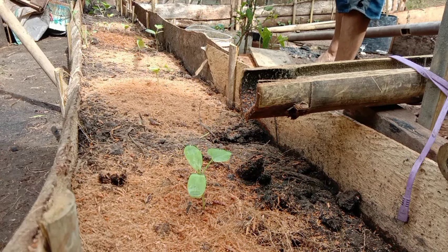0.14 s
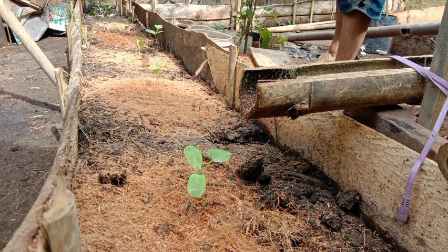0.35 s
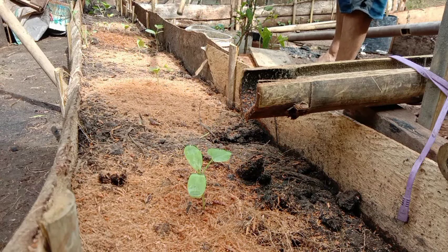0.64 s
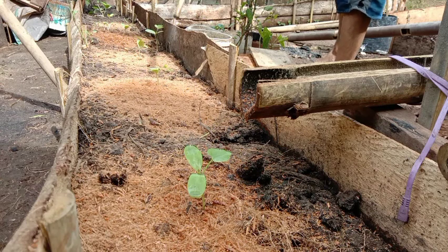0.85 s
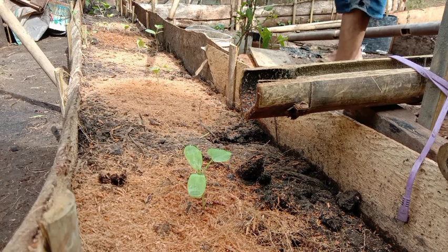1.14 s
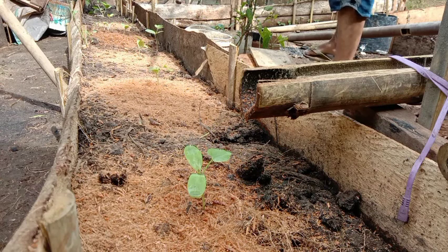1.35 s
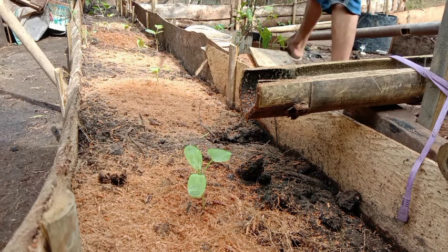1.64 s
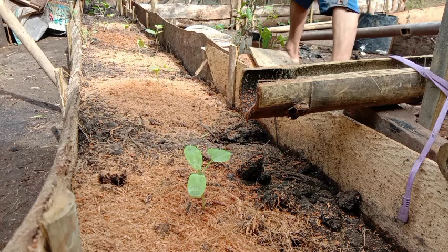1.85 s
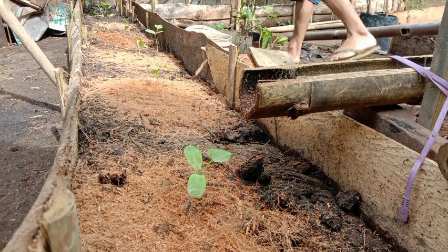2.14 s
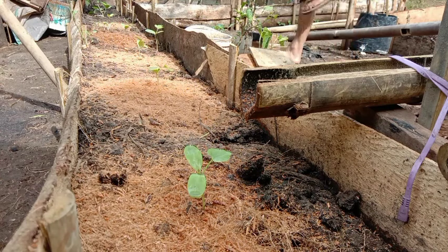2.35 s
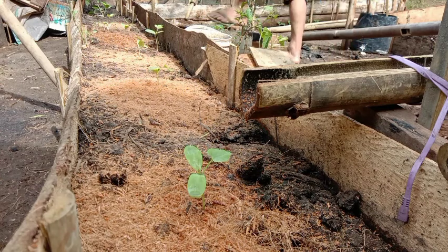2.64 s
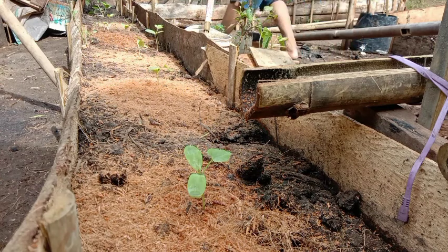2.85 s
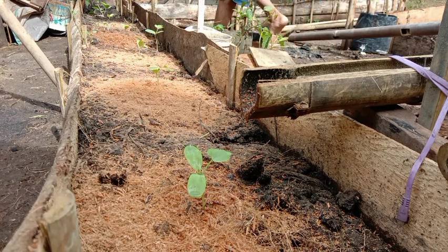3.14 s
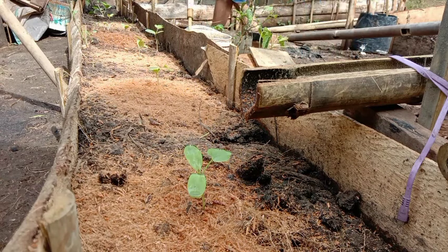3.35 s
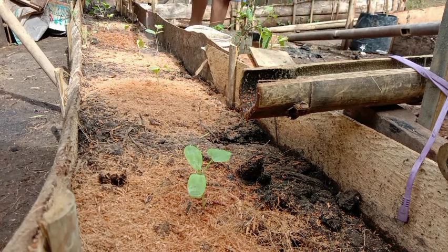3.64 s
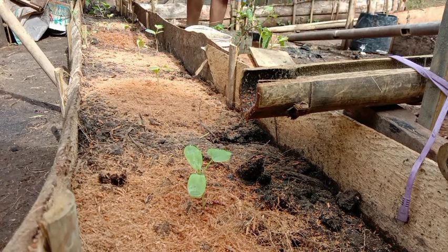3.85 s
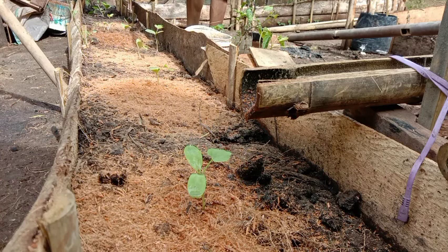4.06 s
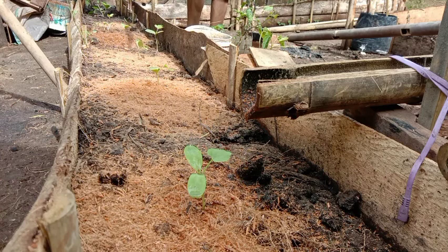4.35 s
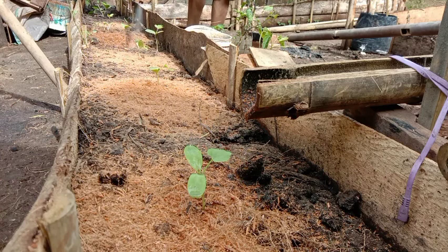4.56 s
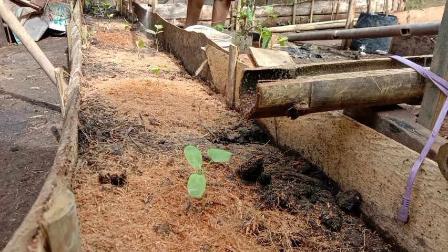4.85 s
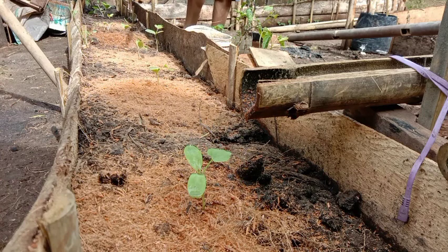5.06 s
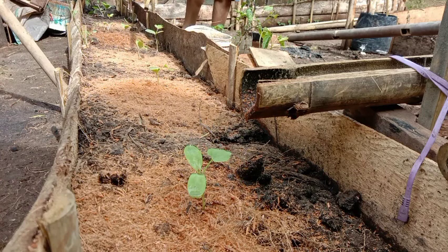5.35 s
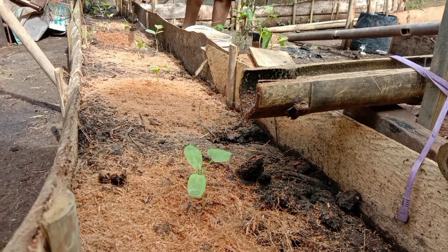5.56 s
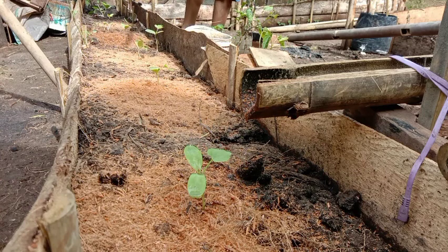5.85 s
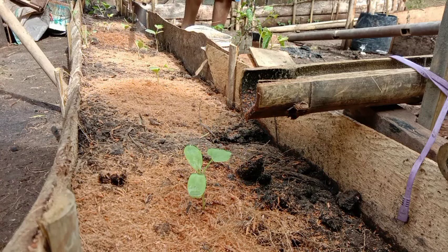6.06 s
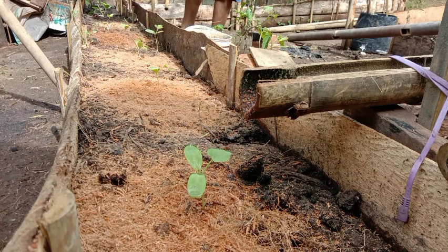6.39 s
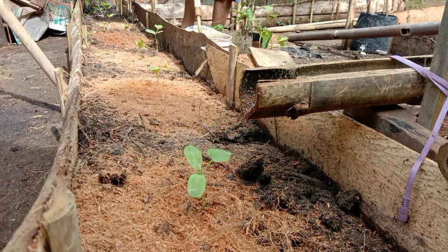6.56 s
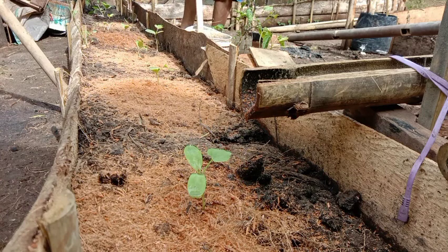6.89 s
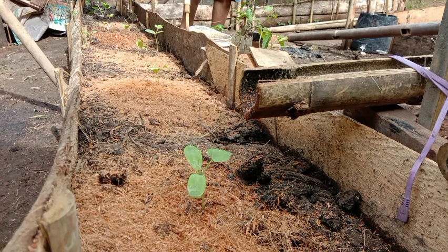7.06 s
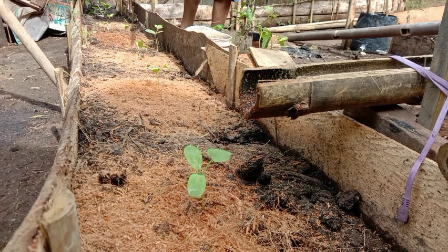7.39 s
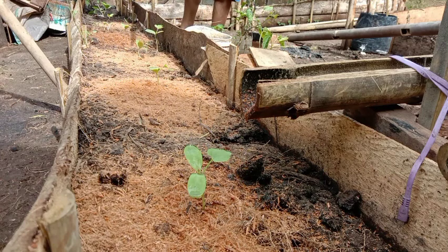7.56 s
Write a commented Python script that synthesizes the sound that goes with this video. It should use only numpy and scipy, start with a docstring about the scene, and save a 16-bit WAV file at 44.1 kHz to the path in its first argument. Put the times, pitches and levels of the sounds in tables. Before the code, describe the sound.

Three runs of short, bright hisses come from a hand sprayer pumped near the microphone outdoors. The first ends in a rubbery honk, followed by faint bird chirps farther off. The second is longer, with sharp spits, wet knocks, trickling and one more honk. In the third, air gets in and the nozzle spits, splutters and sings as the liquid runs out.

```python
"""A hand pump sprayer mists seedlings outdoors, in three runs of quick strokes.
Firm pushes and softer pulls hiss through the nozzle, and on the pulls liquid slurps in the barrel,
falling in pitch. The plunger seal honks as the first run ends, and small birds chirp in the pause.
The second run spits and dribbles, with another loud honk. In the last, air gets into the line:
the jet splutters, the nozzle sings and the sound thins as the barrel runs dry."""
import sys
import numpy as np
from scipy import signal
from scipy.fft import rfft, irfft, next_fast_len
from scipy.io import wavfile
from scipy.ndimage import map_coordinates

SR = 44100
rng = np.random.default_rng(int(sys.argv[2]) if len(sys.argv) > 2 else 0)


def output_pcm(signal):
    """Save a mono or channel-first signal as 16-bit PCM at the path in sys.argv[1].

    Samples are clipped to [-1, 1] before scaling.
    """
    pcm = np.clip(np.atleast_2d(signal).T, -1, 1) * 32767
    wavfile.write(sys.argv[1], SR, np.round(pcm).astype(np.int16))


N = 340893

# Tone of the still air, the jet's body, the sizzle of its finest drops, a spit and the dribble.
# Each row: frequency in Hz, relative level in dB.
AIR_TONE = [(25, -19), (60, -16), (100, -4.5), (180, -7), (400, -22), (1000, -16.5), (2500, -20.5),
            (5500, -25.5), (8000, -21), (10000, -25.5), (14000, -48)]
JET_TONE = [(500, -29), (900, -15), (2100, -13), (3000, -24), (4000, -7), (4700, -2.5), (5500, -1),
            (6300, -1), (7100, -3.5), (8000, -8), (9200, -7.5), (12000, -32)]
MIST_TONE = [(6500, -27), (8500, -8.5), (10400, 6.5), (11200, 3), (12200, 6.5), (12800, -0.5),
             (13600, 11.5), (14500, -18.5)]
SPIT_TONE = [(400, -30.5), (900, -20.5), (2200, -24.5), (3500, -9.5), (5000, -0.5), (7000, 1), (8300, -10),
             (11000, -8), (13700, -15.5)]
DRIBBLE_TONE = [(300, -18), (800, -15.5), (1500, -7.5), (3000, -7.5), (4200, -15.5), (5600, -1.5),
                (7200, 0), (9000, -7), (14000, -9)]
# Short, firm pushes. Each row: start and length in seconds, level and swell over the stroke in dB.
PUSHES = [(-.069, 0.16, -35.5, -11), (0.295, 0.14, -34.5, 0.5), (0.637, 0.16, -34, -7),
          (1.014, 0.2, -34.5, 0), (2.811, 0.11, -41, -4.5), (2.994, 0.18, -33.5, 3),
          (3.401, 0.085, -24.5, -9.5), (3.662, .13, -31, 0.5), (3.999, .11, -33, -14.5),
          (4.304, 0.19, -29.5, -18.5), (4.822, 0.3, -38, -1), (5.465, 0.27, -36.5, 3.5),
          (6.525, 0.15, -40, -33.5), (6.868, 0.17, -37, 5.5)]
# Softer pulls refill the barrel. Each row: start and length in seconds, level, swell and slurp in dB.
PULLS = [(0.115, 0.2, -36.5, -11.5, -50.5), (0.457, 0.21, -37.5, -1.5, -52.5),
         (0.811, 0.23, -38.5, 6.5, -54.5), (3.135, 0.21, -40.5, 11, -47), (3.479, 0.2, -38, -7.5, -51.5),
         (3.817, 0.16, -39, -10, -51.5), (4.086, .18, -42, -0.5, -48.5), (4.503, .35, -41, -7.5, -50.5),
         (5.128, 0.34, -41, 0.5, -56.5), (6.672, 0.25, -48, 30.5, -65), (7.097, .256, -41, 4.5, -85.5)]
# Narrow resonances of nozzle and barrel. Each row: centre and width in Hz, gain in dB.
NOZZLE_RESONANCES = [(3583, 370, -7), (4690, 220, -8), (5160, 120, -4), (5230, 510, -7.5),
                     (5610, 570, -2.5), (6920, 480, -11), (7400, 180, -8.5)]
# The rasp changes with where the wand points. Each row: time in seconds, gain in dB.
RASP_RIDE = [(.6, 0), (1.1, -3), (2.8, -3.5), (5.7, -6.5), (6.7, -5)]
# Air gets into the line. Each row: time in seconds, share of splutter from 0 to 1.
SPLUTTER_MIX = [(0, 0.35), (6.7, 0.29), (6.9, 1), (7.15, 1)]
# The gardener moves about. Each row: start and length in seconds, level in dB.
THUDS = [(0, .1, -71), (2.799, 0.32, -72.5), (3.05, 0.337, -75.5), (5.2, .5, -79), (7.201, 0.17, -72)]
# The barrel rings higher or lower with its liquid. Each row: time in seconds, pitch as a multiple.
BARREL_PITCH = [(1.2, 1.14), (3.1, .96), (4.2, .92), (4.7, 1.08), (5.2, 1.15)]
# The valve snaps open. Each row: start in seconds, level in dB, seconds to die away by 60 dB.
SPITS = [(0.481, -53, 0.068), (.84, -52.5, .1), (2.824, -31, 0.25), (3.355, -36, 0.099),
         (3.384, -40.5, 0.094), (3.4, -26.5, 0.15), (3.661, -42, .08), (3.838, -55, .1), (4.015, -33, 0.12),
         (4.314, -32, 0.13), (6.544, -22.5, 0.13), (7.053, -45, 0.12), (7.108, -40.5, .16),
         (7.311, -34, 0.045)]
# A bird's chip (grace note, loud note, tail) and its answer, three notes stepping down. Each row:
# delay and length in seconds, first and last pitch as multiples, width in Hz, gain in dB.
CHIP_NOTES = [(-.04, 0.11, 1.06, 1.17, 823, -13), (0, .07, .97, 1.05, 615, -0.5),
              (0.056, .06, 1.03, 1, 300, -10)]
CASCADE_NOTES = [(0, 0.072, 0.91, 1.1, 323, 4), (.05, .068, .875, .83, 285, -1),
                 (.095, .06, .77, .7, 420, -12.5)]
# The bird chips. Each row: time in seconds, pitch in Hz, level in dB.
CHIPS = [(0.751, 6440, -61.5), (1.21, 5800, -60.5), (1.595, 5690, -52.5), (2.07, 5480, -57.5),
         (2.72, 5740, -65), (5.079, 5660, -54), (5.92, 6980, -71), (7.349, 6970, -67)]
# It answers. Each row: start in seconds, pitch in Hz, level and accent on the first note in dB.
CASCADES = [(1.304, 5680, -60, -13), (1.78, 5600, -61, -2.5), (2.245, 5510, -64, -1.5),
            (2.871, 5700, -68.5, 9), (5.975, 5320, -60, -25)]
# A lower bird slides down. Each row: start in seconds, first pitch in Hz, level in dB.
BIRD_SLIDES = [(1.45, 3805, -77), (1.685, 2930, -70), (1.73, 4100, -74), (1.776, 3120, -73)]
# Overtones of the rubbing seal. Each row: harmonic number, gain in dB.
SEAL_OVERTONES = [(2, -1), (3, -19.5), (4, -16.5)]
# The seal sticks and honks. Each row: start and length in seconds, pitch in Hz, level in dB.
HONKS = [(.93, 0.041, 412, -40), (1.097, 0.098, 230, -60.5), (4.205, 0.084, 325, -58),
         (4.268, .19, 308, -57), (4.344, 0.039, 376, -38.5)]
# It lets go after a loud honk. Each row: start and length in seconds, level in dB.
GULPS = [(.963, .024, -45), (4.514, 0.015, -47)]
# Its short, pure peeps. Each row: start in seconds, pitch in Hz, level in dB.
PEEPS = [(1.083, 870, -47.5), (4.498, 980, -48.5), (6.151, 845, -54.5)]
# Wet knocks of the plunger. Each row: start and length in seconds, level in dB.
KNOCKS = [(0.963, 0.094, -45), (2.866, 0.059, -40), (3.405, 0.021, -47), (6.553, 0.058, -43)]
# The ring of a knock. Each row: first pitch, last pitch and width in Hz, gain in dB.
KNOCK_RESONANCES = [(399, 460, 350, -12), (884, 740, 470, -1), (1500, 1350, 500, -2.5)]
# Distant hums and calls. Each row: start and length in seconds, pitch in Hz, level in dB.
HUMS = [(1.173, .17, 678, -71.5), (1.61, .25, 410, -71.5), (2.431, 0.19, 424, -75),
        (5.731, 0.67, 1009, -77), (5.796, 0.4, 5150, -78), (5.829, 0.5, 2060, -83),
        (2.401, 0.037, 1500, -71.5)]
# A far drone. Each row: start and length in seconds, first pitch, last pitch, width in Hz, level in dB.
DRONE = [(1.6, .29, 122, 88, 28, -64), (1.6, .11, 260, 200, 60, -69)]
# Weak mist around the strokes. Each row: start and length in seconds, level and swell in dB.
DRIBBLES = [(2.419, 0.44, -58, 1.5), (3.086, 1.63, -58.5, -7.5), (6.208, 0.42, -60.5, 3)]
# The nozzle starts up. Each row: start and length in seconds, first and last pitch in Hz, level in dB.
SQUIRTS = [(2.46, 0.042, 2800, 3110, -63.5), (2.985, 0.064, 1120, 3940, -56.5),
           (4.785, .093, 5280, 4640, -45.5), (4.835, 0.063, 1900, 3340, -54)]
# The nozzle sings, one curve a stroke. Each point: time in seconds, pitch in Hz, level in dB.
SINGING_CURVES = [
    [(6.84, 3210, -61.5), (6.88, 3025, -48.5), (6.908, 3280, -54), (6.924, 3260, -41), (6.994, 3030, -40),
     (7.02, 3260, -73)],
    [(7.103, 2513, -60), (7.118, 2503, -52), (7.19, 2325, -54), (7.28, 2450, -59), (7.322, 2480, -48.5),
     (7.35, 2500, -70)],
]
# Its partials. Each row: pitch as a multiple, width in Hz, gain in dB.
SINGING_PARTIALS = [(0.999, 323, -1), (1.931, 450, -4.5)]


def undb(db):
    """Decibels to gain."""
    return 10 ** (np.asarray(db) / 20)


def unit(x):
    """Scale to rms 1."""
    return x / np.sqrt(np.mean(x ** 2) + 1e-18)


def add(out, start, x):
    """Mix x into out at start seconds."""
    i = int(start * SR)
    x, i = x[max(-i, 0):], max(i, 0)
    out[i:i + len(x)] += x[:max(len(out) - i, 0)]


def curve(points):
    """An automation line through (seconds, value) points."""
    return np.interp(np.arange(N) / SR, *np.transpose(points))


def colour(x, points):
    """EQ x through (Hz, dB) points, at rms 1."""
    hz, db = np.transpose(points)
    size = next_fast_len(len(x))
    bins_hz = np.maximum(np.fft.rfftfreq(size, 1 / SR), 1)
    gain = undb(np.interp(np.log(bins_hz), np.log(hz), db))
    return unit(irfft(rfft(x, size) * gain, size)[:len(x)])


def resonate(x, hz, width):
    """One resonance, gain 1 at its centre."""
    return signal.lfilter(*signal.iirpeak(hz, hz / width, fs=SR), x + 1e-18 * rng.standard_normal(len(x)))


def wander(count, rate_hz):
    """Smooth random drift of rms 1, slower than rate_hz."""
    lead = SR // 10
    sos = signal.butter(4, rate_hz, fs=SR, output="sos")
    return unit(signal.sosfilt(sos, rng.standard_normal(count + lead))[lead:])


def flutter(x, depth_db, width_hz, hold_s):
    """Patches of the spectrum swell and fade by chance, each for about hold_s."""
    hz, t, spectrum = signal.stft(x, SR, nperseg=1024)
    chance = rng.standard_normal((200, 400))
    grid = np.meshgrid(hz / width_hz, t / hold_s, indexing="ij")
    patches = unit(map_coordinates(chance, grid, order=1, mode="wrap"))
    _, fluttered = signal.istft(spectrum * undb(depth_db * patches), SR, nperseg=1024)
    return unit(fluttered[:len(x)]) * np.std(x)


def gate(length, rise, fall):
    """An envelope with smooth fades, all in seconds."""
    t = np.arange(int(length * SR)) / SR
    fade_in = np.sin(np.pi / 2 * np.clip(t / rise, 0, 1))
    fade_out = np.sin(np.pi / 2 * np.clip((length - t) / fall, 0, 1))
    return (fade_in * fade_out) ** 2


def swelling(env, db, swell_db):
    """Ramp an envelope by swell_db, passing db halfway."""
    return env * undb(db + swell_db * np.linspace(-.5, .5, len(env)))


def glide(count, first_hz, last_hz):
    """Phase of a sliding pitch."""
    return 2 * np.pi * np.cumsum(np.geomspace(first_hz, last_hz, count)) / SR


def blown(phase, width_hz):
    """A breathy resonance that follows a phase, blown by turbulence."""
    count, rate_hz = len(phase), width_hz / 2
    return unit(wander(count, rate_hz) * np.cos(phase) + wander(count, rate_hz) * np.sin(phase))


def notes(rows, rise_share, fall_share):
    """Play rows of breathy, gliding notes."""
    out = np.zeros(N)
    for start, length, first_hz, last_hz, width_hz, db in rows:
        env = gate(length, rise_share * length, fall_share * length)
        add(out, start, undb(db) * env * blown(glide(len(env), first_hz, last_hz), width_hz))
    return out


def still_air(db=-83):
    """A bed of outdoor air that flickers faintly."""
    air = colour(rng.standard_normal(N), AIR_TONE)
    return undb(db) * flutter(air, depth_db=3, width_hz=400, hold_s=.12)


def droplets(spread_db):
    """The jet breaks up into a dense stream of tiny, unequal clicks."""
    return rng.standard_normal(N) * undb(spread_db * wander(N, 3900))


def spray(jet_db=-4.5, rasp_db=-5.5, mist_db=-7, rumble_db=-46, sputter_db=.67,
          rasp_hz=3150, rasp_width_hz=1200, rasp_loss=.54, rasp_ref_db=-39.5):
    """Pump pressure drives the jet, its coarse rasp and the fine mist; the flow sputters a little."""
    flow, rasp_flow = np.zeros((2, N))
    for strokes, rise_s, fall_s in (PUSHES, .061, .059), (PULLS, .12, .07):
        for start, length, db, swell_db, *_ in strokes:
            env = swelling(gate(length, rise_s, fall_s), db, swell_db)
            add(flow, start, env)
            # a harder jet breaks up finer, so less of it is rasp
            add(rasp_flow, start, env * undb(-rasp_loss * (db - rasp_ref_db)))
    jet = undb(jet_db) * flow * colour(droplets(spread_db=.5), JET_TONE)
    rasp = resonate(droplets(spread_db=0), rasp_hz, rasp_width_hz)
    rasp = unit(resonate(rasp, rasp_hz, rasp_width_hz))
    jet += undb(rasp_db + curve(RASP_RIDE)) * rasp_flow * rasp
    jet += sum(undb(db) * resonate(jet, hz, width) for hz, width, db in NOZZLE_RESONANCES)
    mist = undb(mist_db) * flow * colour(droplets(spread_db=3), MIST_TONE)
    # the moving wand shifts the resonances of the hiss
    hiss = flutter(jet + mist, depth_db=2.6, width_hz=130, hold_s=.07)
    # the pump body rumbles while it is worked
    rumble = colour(rng.standard_normal(N), [(30, -21.5), (110, 8), (250, -1.5), (600, -17), (1500, -42.5)])
    return hiss * undb(sputter_db * wander(N, 63)) + undb(rumble_db) * flow * rumble


def splutter(hiss, surge_db=2):
    """Bubbles passing the nozzle break the hiss into brief, coarse resonances and make it surge."""
    share = curve(SPLUTTER_MIX)
    broken = flutter(hiss, depth_db=4.3, width_hz=330, hold_s=.022)
    return (1 - share) * hiss + share * broken * undb(surge_db * wander(N, 45))


def barrel_pitch(time):
    """The barrel's tuning at a time, as a multiple."""
    return np.interp(time, *np.transpose(BARREL_PITCH))


def bubbles(count, low_hz=650, high_hz=1500, cycles=22, size_db=4):
    """A dense stream of small bubbles, each a short rising ring."""
    out = np.zeros(N)
    for when, pitch, size in rng.random((count, 3)):
        hz = low_hz * (high_hz / low_hz) ** pitch
        samples = int(cycles * SR / hz)
        ring = np.exp(-np.linspace(0, 5, samples)) * np.sin(glide(samples, hz, 1.2 * hz))
        add(out, when * N / SR, undb(-size_db * np.log(size + .02)) * ring)
    return unit(out)


def slurp(first_hz=1250, last_hz=850, width_hz=650, low_cut_hz=520,
          push_db=-60, rush_db=-2, skirt_db=-7, gurgle_db=.5, bubble_db=-2):
    """Liquid and air churn in the barrel; the cavity grows along the stroke, so its resonance sinks."""
    rush, flow = np.zeros((2, N))
    for start, length, _, _, db in [(*push, push_db) for push in PUSHES] + list(PULLS):
        env = undb(db) * gate(length, rise=.078, fall=.05)
        phase = barrel_pitch(start) * glide(len(env), first_hz, last_hz)
        core, skirt = blown(phase, width_hz), blown(phase, 3 * width_hz)
        add(flow, start, env)
        add(rush, start, env * (core + undb(skirt_db) * skirt))
    churn = rush * undb(rush_db + gurgle_db * wander(N, 55))
    churn += undb(bubble_db) * flow * bubbles(count=1200)
    churn = flutter(churn, depth_db=4, width_hz=150, hold_s=.03)
    low_cut = signal.butter(4, low_cut_hz, "high", fs=SR, output="sos")
    return signal.sosfilt(low_cut, churn + 1e-18 * rng.standard_normal(N))


def thuds(first_hz=115, last_hz=90, width_hz=100):
    """The gardener's movements thud softly through the boards."""
    rows = [(start, length, first_hz, last_hz, width_hz, db) for start, length, db in THUDS]
    return notes(rows, rise_share=.15, fall_share=.41)


def glugs(at_share=.55, length_share=.36, first_hz=980, last_hz=686.4, width_hz=230, gain_db=-7.5):
    """The liquid glugs once partway through each pull, falling in pitch, its level tied to the slurp."""
    rows = [(start + at_share * length, length_share * length,
             barrel_pitch(start) * first_hz, barrel_pitch(start) * last_hz, width_hz, slurp_db + gain_db)
            for start, length, _, _, slurp_db in PULLS]
    return notes(rows, rise_share=.44, fall_share=1)


def spits(attack_s=.0011, click_db=-5, click_t60=.02):
    """Each snap of the valve clicks and lets out a short, ringing burst of spray."""
    flow, t = np.zeros(N), np.arange(SR // 4) / SR
    for start, db, t60 in SPITS:
        decay = undb(-60 * t / t60) + undb(click_db - 60 * t / click_t60)
        add(flow, start, undb(db) * np.minimum(t / attack_s, 1) * decay)
    burst = colour(droplets(spread_db=3), SPIT_TONE)
    return flow * flutter(burst, depth_db=3.2, width_hz=300, hold_s=.12)


def birds(slide_s=.075, slide_ratio=.83, slide_width_hz=210):
    """One bird trades chips and cascades; a lower one slides down in single notes between them."""
    rows = [(start + delay, length, hz * first, hz * last, width, db + note_db)
            for start, hz, db in CHIPS for delay, length, first, last, width, note_db in CHIP_NOTES]
    for start, hz, db, accent_db in CASCADES:
        for k, (delay, length, first, last, width, note_db) in enumerate(CASCADE_NOTES):
            level_db = db + note_db + (accent_db if k == 0 else 0)
            rows.append((start + delay, length, hz * first, hz * last, width, level_db))
    rows += [(start, slide_s, hz, hz * slide_ratio, slide_width_hz, db) for start, hz, db in BIRD_SLIDES]
    return notes(rows, rise_share=.18, fall_share=.46)


def squeak(length, first_hz, last_hz, overtones_db, rough):
    """One stick-slip note of the wet seal."""
    env = gate(length, length / 3, length / 3)
    phase = glide(len(env), first_hz, last_hz) + rough * wander(len(env), 200)
    tone = np.sin(phase) + sum(undb(overtones_db + db) * np.sin(k * phase) for k, db in SEAL_OVERTONES)
    return np.sqrt(2) * env * tone * (1 + rough * wander(len(env), 200))


def plunger_seal(honk_glide=1.05, brightening=.6, bright_ref_db=-41.5, peep_s=.021, peep_glide=.95):
    """The seal honks, brighter the harder it rubs, gulps as it lets go and now and then peeps."""
    out = np.zeros(N)
    for start, length, hz, db in HONKS:
        bend = honk_glide ** .5
        overtones_db = brightening * (db - bright_ref_db)
        add(out, start, undb(db) * squeak(length, hz / bend, hz * bend, overtones_db, rough=.096))
    for start, length, db in GULPS:
        add(out, start, undb(db) * squeak(length, first_hz=828, last_hz=252, overtones_db=2, rough=.2))
    for start, hz, db in PEEPS:
        bend = peep_glide ** .5
        add(out, start, undb(db) * squeak(peep_s, hz / bend, hz * bend, overtones_db=-35, rough=.079))
    return out


def knocks():
    """Each wet knock of the plunger rings in three broad resonances."""
    rows = [(start, length, first_hz, last_hz, width_hz, db + ring_db)
            for start, length, db in KNOCKS for first_hz, last_hz, width_hz, ring_db in KNOCK_RESONANCES]
    return notes(rows, rise_share=.44, fall_share=1)


def hums(width_share=.047, waver_db=2):
    """Faint, wavering tones from far off, and one low drone that sinks."""
    rows = [(start, length, hz, hz, width_share * hz, db) for start, length, hz, db in HUMS]
    return notes(rows + list(DRONE), rise_share=.25, fall_share=.25) * undb(waver_db * wander(N, 14))


def dribble(gurgle_hz=780, gurgle_width_hz=160, gurgle_db=10, uneven_db=2):
    """With little pressure left the nozzle trickles unevenly and the barrel gurgles with it."""
    flow = np.zeros(N)
    for start, length, db, swell_db in DRIBBLES:
        add(flow, start, swelling(gate(length, rise=.15, fall=.075), db, swell_db))
    trickle = colour(droplets(spread_db=-2.5), DRIBBLE_TONE)
    trickle += undb(gurgle_db) * resonate(trickle, gurgle_hz, gurgle_width_hz)
    flow *= undb(uneven_db * wander(N, 30))
    return flow * flutter(trickle, depth_db=4.5, width_hz=230, hold_s=.06)


def whistles(squirt_width_hz=800, waver_db=3.5):
    """The nozzle squirts in short glides, and sings in two breathy partials once air comes through."""
    rows = [(start, length, first, last, squirt_width_hz, db) for start, length, first, last, db in SQUIRTS]
    out = notes(rows, rise_share=.17, fall_share=.067)
    for points in SINGING_CURVES:
        times, hz, db = np.transpose(points)
        t = np.arange(times[0], times[-1], 1 / SR)
        phase = 2 * np.pi * np.cumsum(np.interp(t, times, hz)) / SR
        tone = sum(undb(gain_db) * blown(k * phase, width) for k, width, gain_db in SINGING_PARTIALS)
        level_db = np.interp(t, times, db) + waver_db * wander(len(t), 45)  # wavers as bubbles pass
        add(out, times[0], undb(level_db) * tone)
    return flutter(out, depth_db=3, width_hz=170, hold_s=.025)


def run_dry(x, empty_at_s=7, drain_s=.21, low_cut_hz=1800):
    """As the barrel empties, the wet low end drains away."""
    liquid = np.clip((empty_at_s - np.arange(N) / SR) / drain_s, 0, 1)
    low_cut = signal.butter(2, low_cut_hz, "high", fs=SR, output="sos")
    thin = signal.sosfiltfilt(low_cut, x + 1e-18 * rng.standard_normal(N))
    return liquid * x + (1 - liquid) * thin


def garden(x, t60, wet_db):
    """Add the diffuse echo of boards and fences."""
    t = np.arange(SR // 2) / SR
    tail = rng.standard_normal(len(t)) * undb(-60 * t / t60)
    return x + undb(wet_db) * signal.fftconvolve(x, tail / np.linalg.norm(tail))[:len(x)]


def scene():
    """The sprayer up close, birds and hums further off, over a bed of still air."""
    pumping = run_dry(splutter(spray()) + spits() + slurp())
    close = pumping + dribble() + glugs() + knocks() + plunger_seal() + whistles() + thuds()
    near = garden(close, t60=.17, wet_db=-17)
    far = garden(birds(), t60=.29, wet_db=-2) + garden(hums(), t60=.32, wet_db=-8)
    return (near + far + still_air())[None]


def record(dry):
    """A steep high cut on the whole mix."""
    top_hz = 14050
    return signal.sosfilt(signal.ellip(10, .2, 70, top_hz, fs=SR, output="sos"), dry)


dry = scene()
out = record(dry)
output_pcm(out)
```